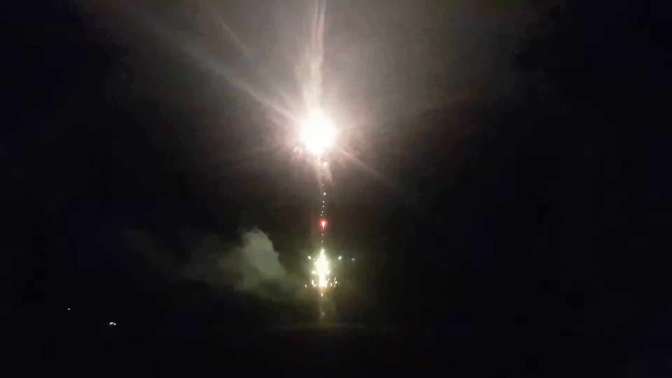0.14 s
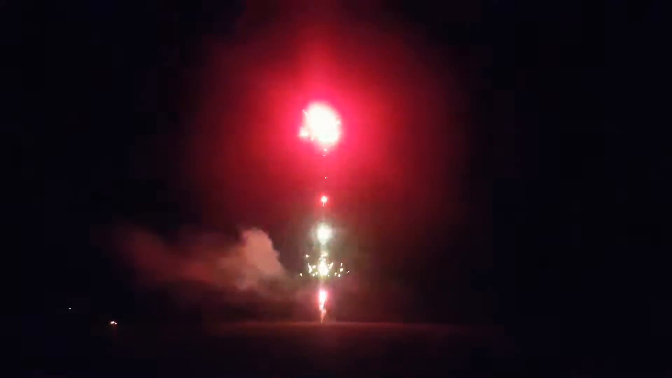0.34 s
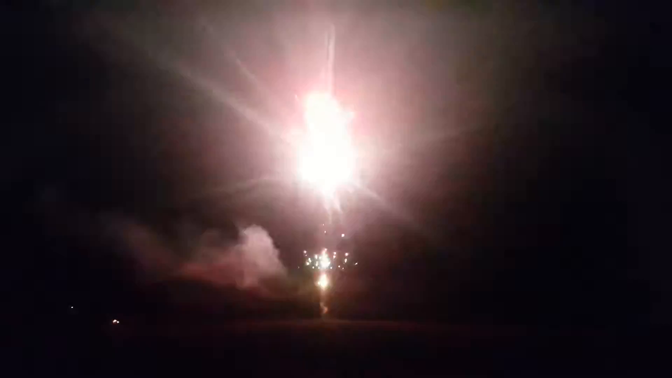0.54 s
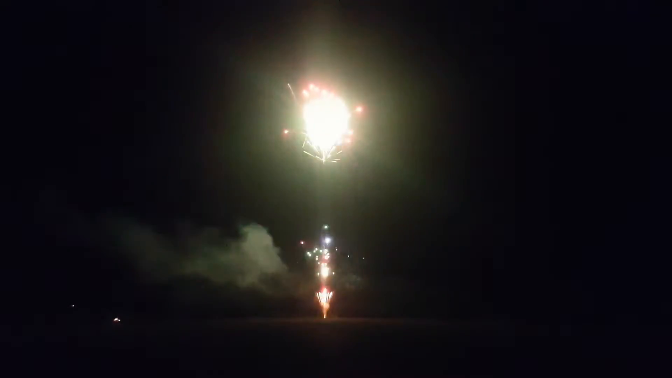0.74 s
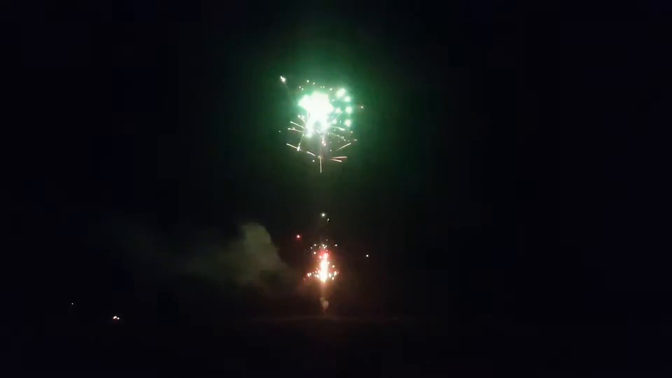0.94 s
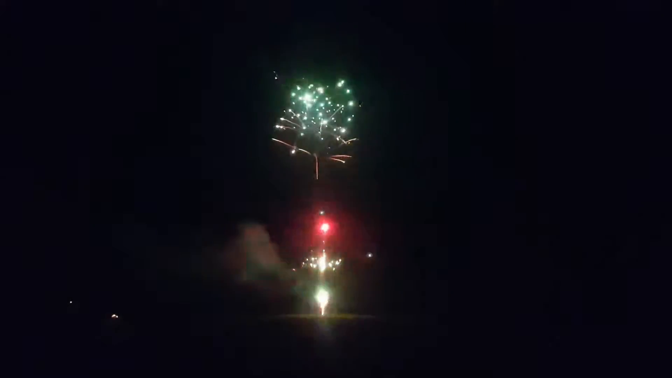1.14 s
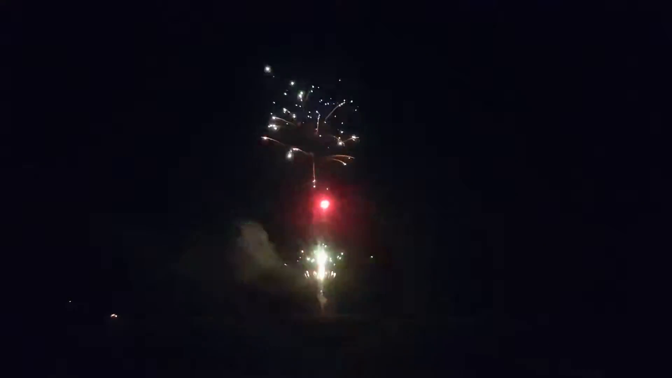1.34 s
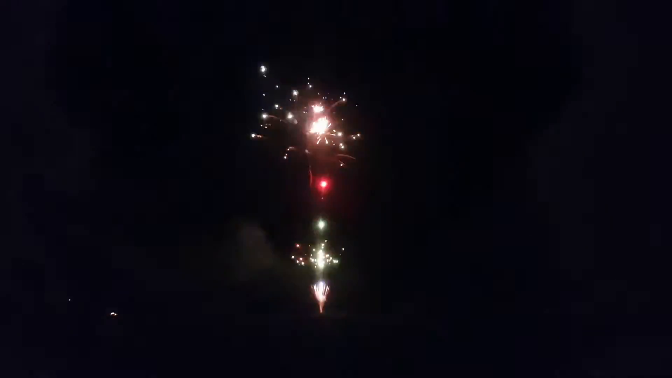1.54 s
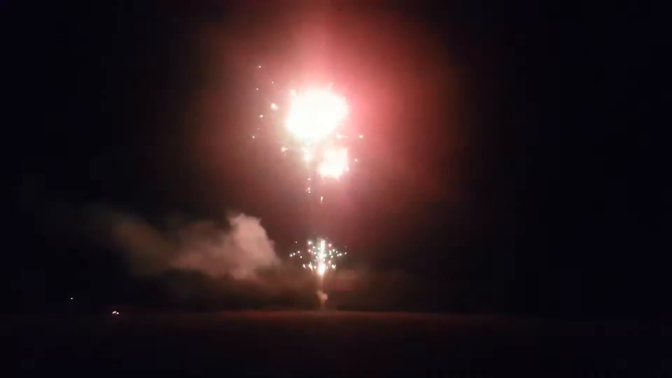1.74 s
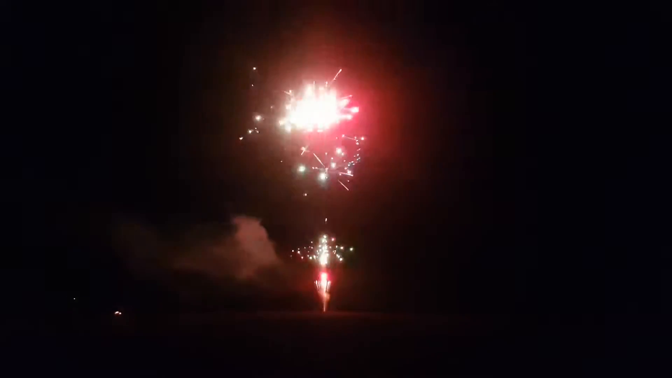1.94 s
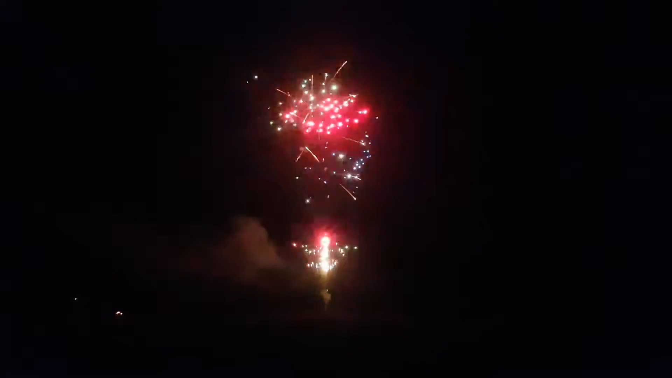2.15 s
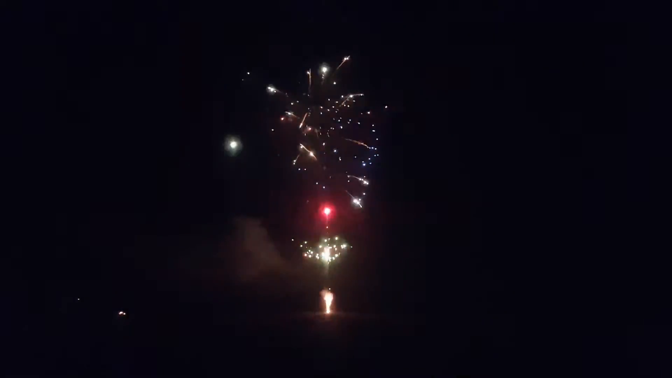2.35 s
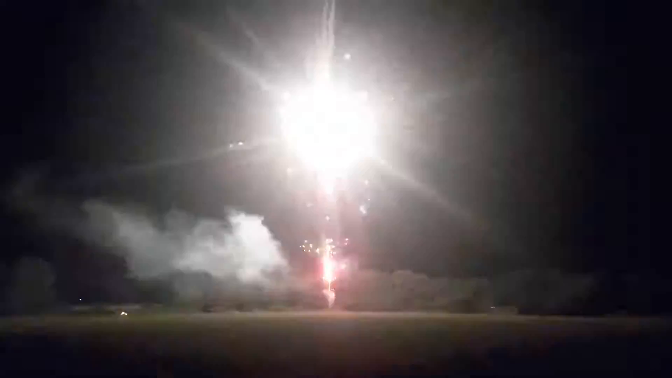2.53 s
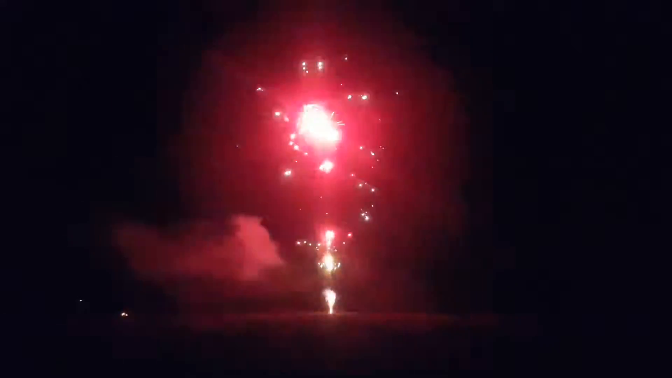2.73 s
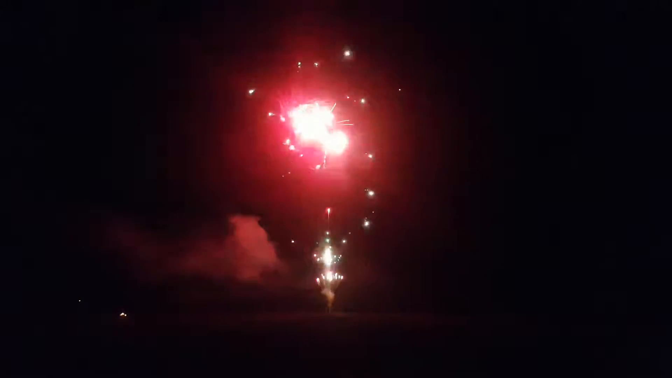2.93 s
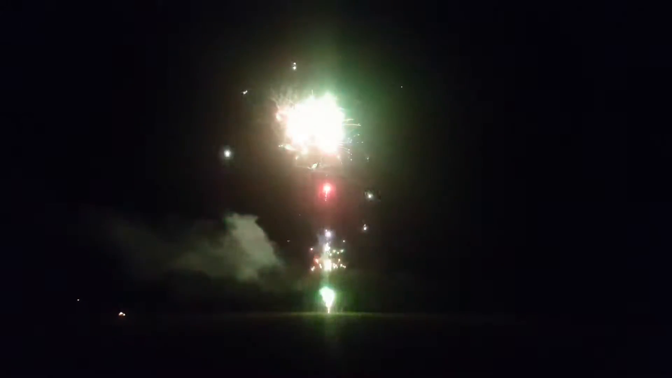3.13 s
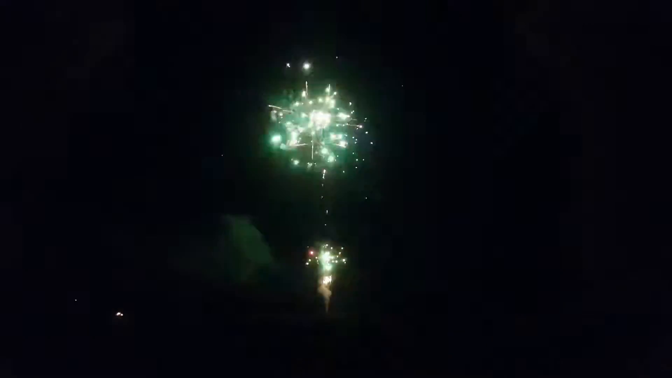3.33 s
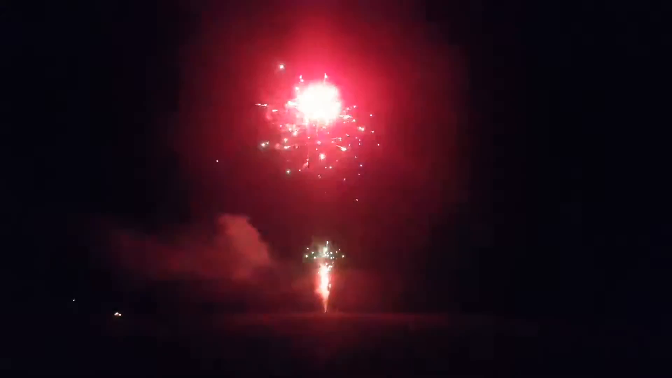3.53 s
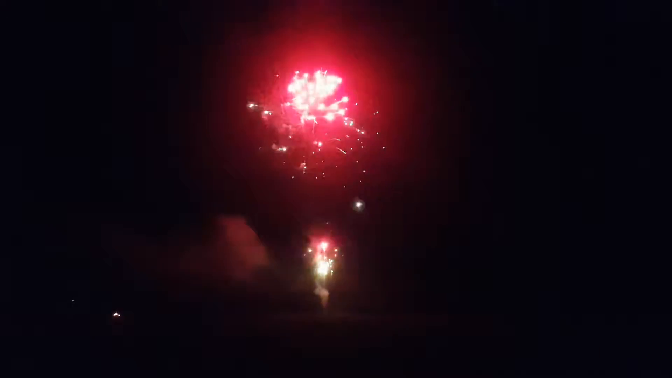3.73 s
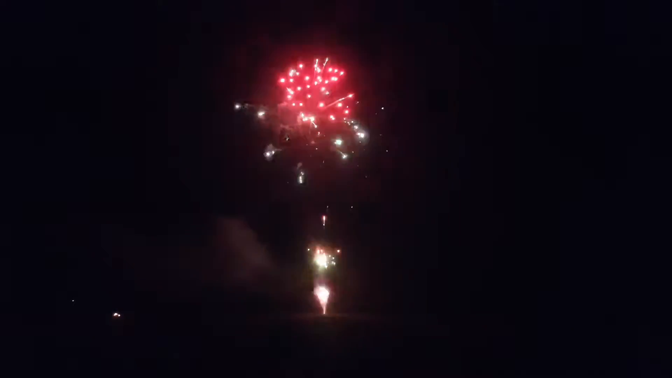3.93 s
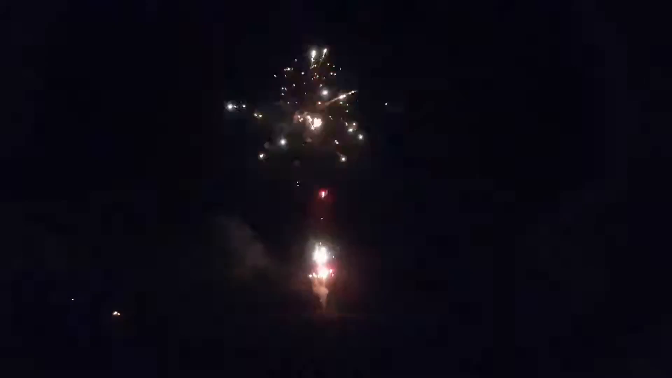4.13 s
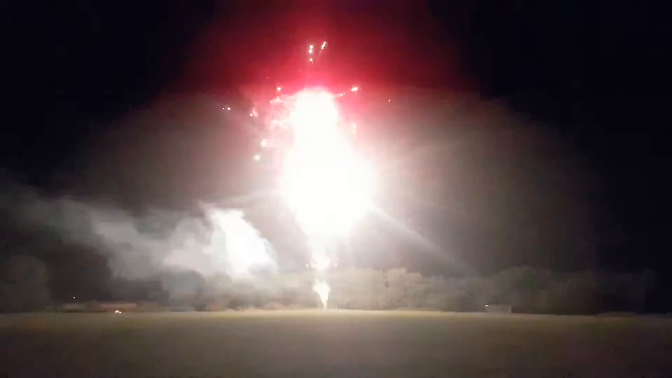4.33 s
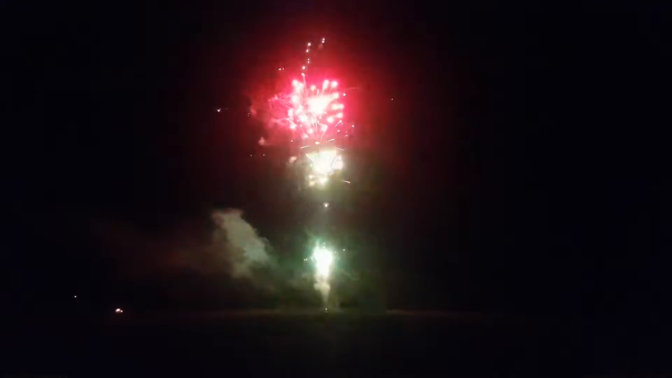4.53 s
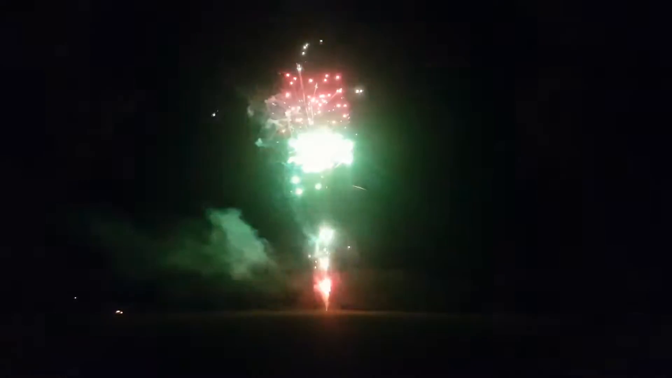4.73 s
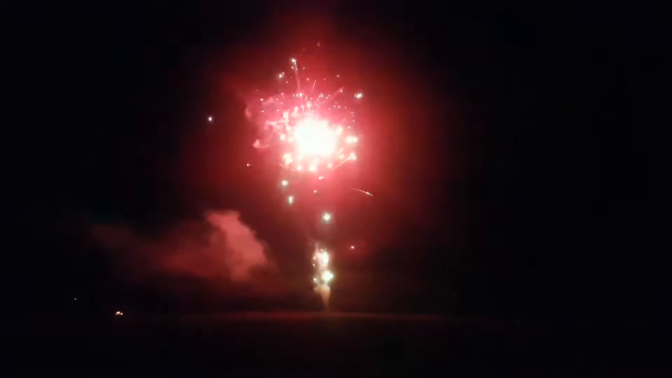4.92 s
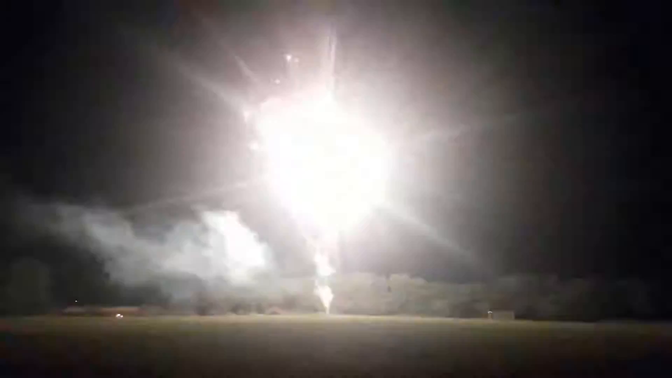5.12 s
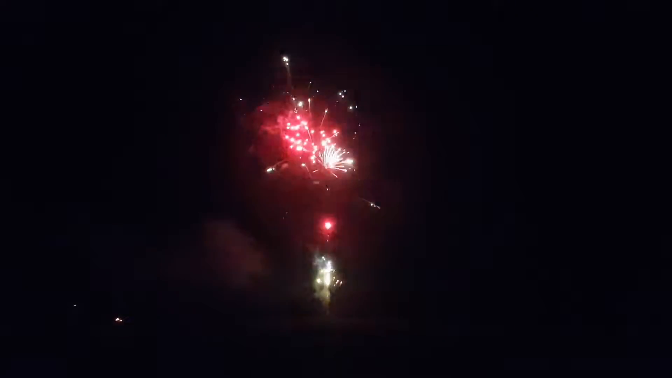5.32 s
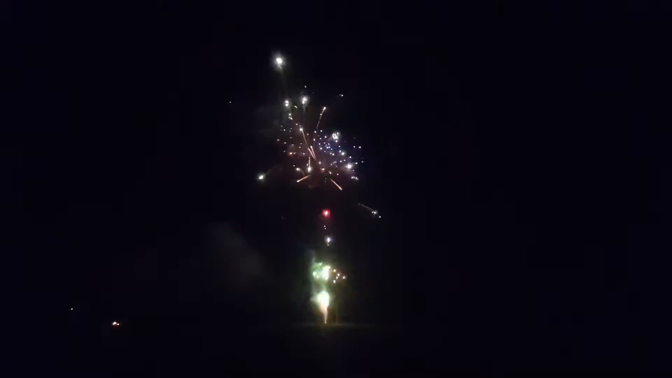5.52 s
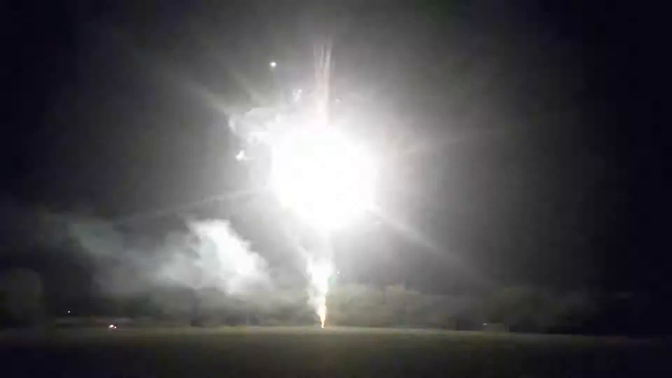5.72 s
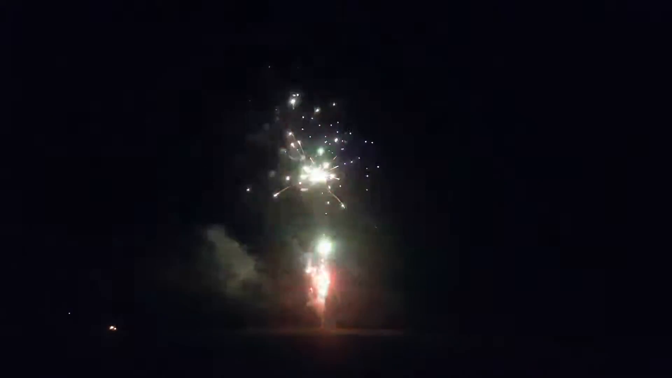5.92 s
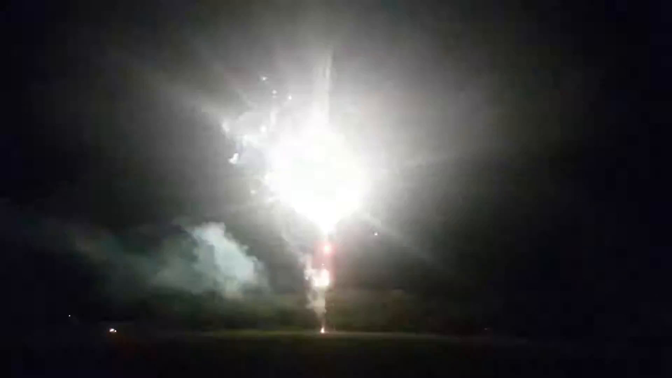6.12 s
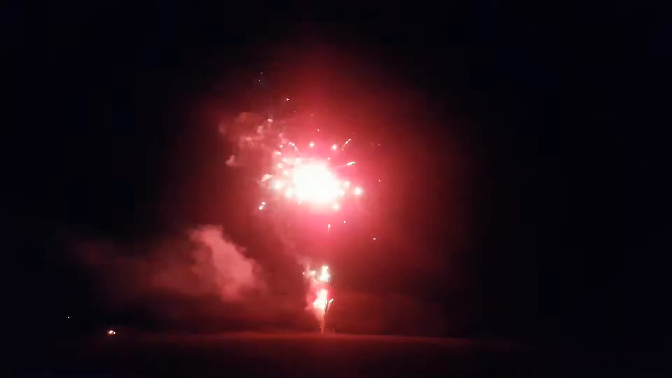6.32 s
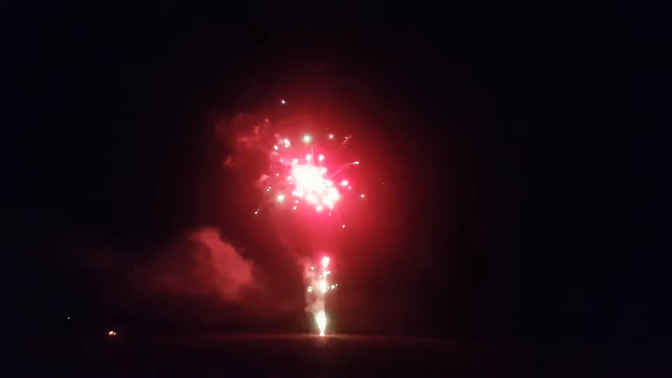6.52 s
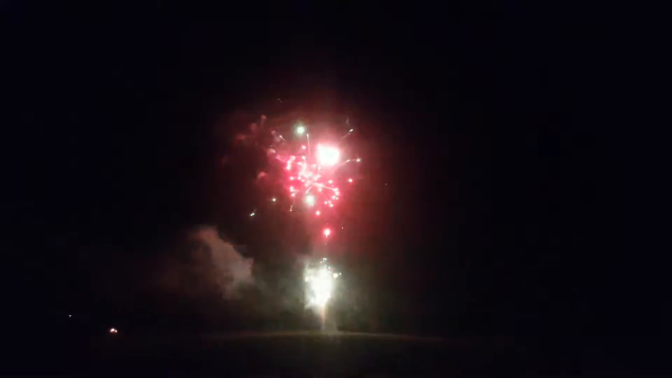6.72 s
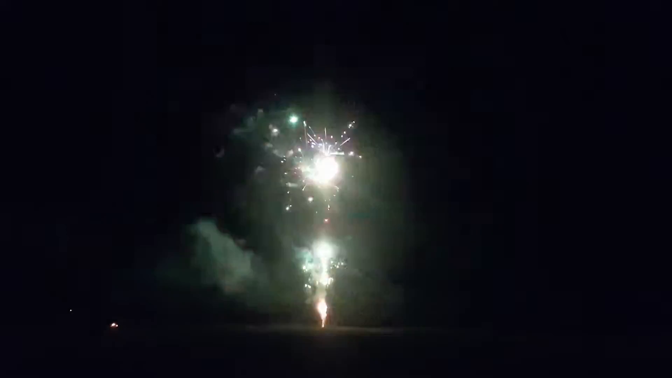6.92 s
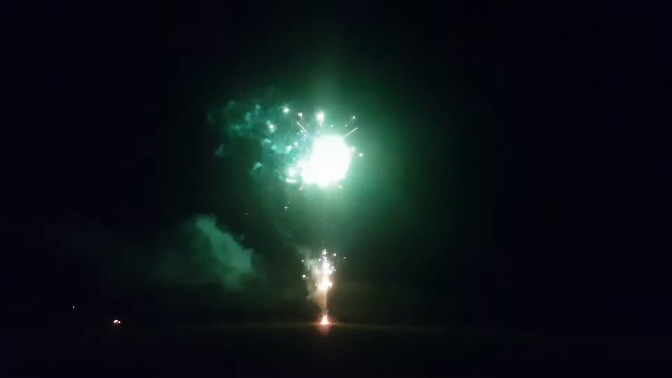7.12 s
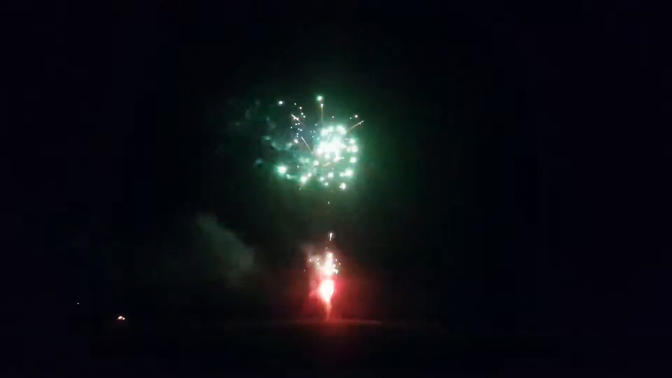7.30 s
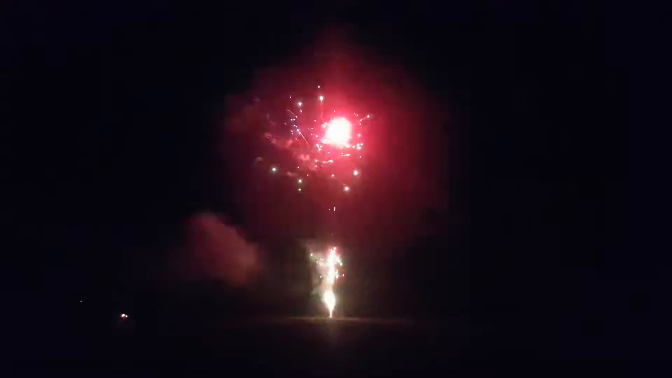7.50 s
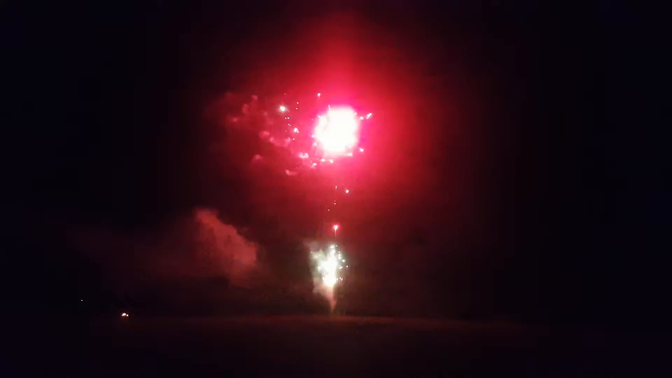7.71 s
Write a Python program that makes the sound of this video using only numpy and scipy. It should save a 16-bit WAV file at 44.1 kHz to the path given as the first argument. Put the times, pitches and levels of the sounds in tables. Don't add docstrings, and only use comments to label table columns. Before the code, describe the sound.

At first only tube pops with woody, knocking tone and short echoes; then a very loud shell crack, followed by irregular single, double and triple bangs until the end. Pops keep launching beneath them. The field is wide, with tree-line reflections smearing each bang for some tenths of a second. Recorded at a distance on a handheld device, distorted on bursts, with thin hiss and slight wind.

```python
import sys
import numpy as np
from scipy import signal
from scipy.io import wavfile
from scipy.ndimage import uniform_filter1d

SR = 44100
rng = np.random.default_rng(int(sys.argv[2]) if len(sys.argv) > 2 else 0)


def inscribe(sig):
    pcm = np.round(np.clip(np.atleast_2d(sig).T, -1, 1) * 32767)
    wavfile.write(sys.argv[1], SR, pcm.astype(np.int16))


def makeup_ratio(level_db):
    decades = np.asarray(level_db, float) / 20
    return 10 ** decades


N = 342216


def evened(x):
    return x / np.sqrt(np.mean(x ** 2) + 1e-20)


def read(points, hz):
    f, value = np.transpose(points)
    return np.interp(np.log(hz + 1), np.log(f + 1), value)


def add(mix, s, sound):
    part = mix[:, round(s * SR):][:, :sound.shape[-1]]
    part += sound[..., :part.shape[1]]


def band(x, lo_hz, hi_hz):
    sos = signal.butter(2, [lo_hz, min(hi_hz, SR / 2.1)], "band", fs=SR, output="sos")
    return signal.sosfilt(sos, x)


def ring(x, hz, q):
    return signal.lfilter(*signal.iirpeak(hz, q, SR), x)


# pitch_hz, likeness (-1 to 1)
PORT_LIKENESS = [(60, 1), (300, 0.89), (640, 0.77), (1400, -0.11), (3100, 0.25), (7000, -0.09)]
# pitch_hz, left_minus_right_db
PORT_BALANCE = [(100, -0.5), (700, 0.3), (2400, -1.5), (8000, -6), (15000, 8.5)]


def port_noise(gain):
    hz = np.fft.rfftfreq(256, 1 / SR)
    a, b, c, d = rng.standard_normal((gain.shape[1], 129, 4)).T
    same = np.clip(read(PORT_LIKENESS, hz), -1, 1)[:, None]
    lean = makeup_ratio(read(PORT_BALANCE, hz) / 2)[:, None]
    left = a + 1j * b
    right = same * left + np.sqrt(1 - same ** 2) * (c + 1j * d)
    spectra = np.array([left * lean, right / lean])
    return signal.istft(spectra * gain, nperseg=256, noverlap=192)[1][:, :N] / 10


# start_s, rumble_db
GUSTS = [(0.0, -68), (0.52, -67.5), (0.84, -65), (1.56, -76), (2.12, -53), (2.64, -81), (2.94, -73.5),
         (3.35, -58), (3.72, -62), (4.9, -60), (5.12, -69.5), (6.33, -83), (6.76, -66), (6.89, -62.5),
         (7.28, -58), (7.76, -61)]


def wind():
    s, rumble_db = np.transpose(GUSTS)
    lumps = evened(uniform_filter1d(rng.standard_normal(N), 2500))
    air = rng.standard_normal((2, N)) + 3.1 * rng.standard_normal(N)
    rumble = evened(band(band(air, 37, 183), 30, 300))
    return rumble * makeup_ratio(np.interp(np.arange(N) / SR, s, rumble_db) + 4.0 + 2.4 * lumps)


def gate():
    open_db, shut_db, closing_db, closing_db_per_s = -79.5, -97.5, -6, 50
    ease_db, ease_growth, ease_s, ease_lag_s = -106, 1.6, .16, .05
    t = np.arange(0, N + 64, 64) / SR
    first_s = BURSTS[0][0]
    closing = np.maximum(open_db + closing_db - closing_db_per_s * (t - first_s), shut_db)
    power = makeup_ratio(np.where(t < first_s, open_db, closing)) ** 2
    for s, db, *_ in BURSTS[1:]:
        swell = np.exp(-((t - s - ease_lag_s) / ease_s) ** 2)
        power = power + makeup_ratio(ease_db + ease_growth * db) ** 2 * swell
    return np.interp(np.arange(N) / SR, t, np.sqrt(power))


# pitch_hz, level_db (per Hz)
HISS_COLOUR = [(100, 6), (1000, -0.5), (9000, -2), (13000, 1), (15650, -2.5), (15900, -33)]


def hiss():
    t = np.arange(N) / SR
    whine_hz, whine_db, drift_hz_per_s = 13590, -14.5, 22
    colour = makeup_ratio(read(HISS_COLOUR, np.fft.rfftfreq(256, 1 / SR)))[:, None]
    steady = evened(port_noise(colour * np.ones(N // 64 + 5)))
    whine = makeup_ratio(whine_db) * np.sin(2 * np.pi * (whine_hz + drift_hz_per_s * t / 2) * t)
    return (steady + whine) * makeup_ratio(10.0) * gate()


# pitch_hz, fade_db_per_s
AIR_FADE = [(200, -11.5), (1000, 4.5), (3000, 0.5), (8000, 20)]


def echoes(times, levels_db, field, colour):
    t, hz = np.arange(N // 64 + 5) * 64 / SR, np.fft.rfftfreq(256, 1 / SR)
    power = np.zeros((len(hz), len(t)))
    for s, db in zip(times, levels_db):
        span = (t > s + field[0][0]) & (t < s + 1.6)
        late = t[span] - s
        shape = 0
        for at, top_db, swell, fade in field:
            below_db = np.maximum(swell * (at - late), fade * (late - at))
            shape = shape + makeup_ratio(top_db - below_db) ** 2
        power[:, span] += shape * makeup_ratio(2 * db - 2 * np.outer(read(AIR_FADE, hz), late))

    def uneven(bins, frames):
        raw = uniform_filter1d(rng.standard_normal((len(t), 129)), bins, 1)
        return evened(uniform_filter1d(raw, frames, 0)).T

    clumps, patches = uneven(40, 3), uneven(3, 16)
    return port_noise(np.sqrt(power) * makeup_ratio(read(colour, hz)[:, None] + 1.5 * clumps + 1.43 * patches))


# delay_s, level_db, swell_db_per_s, fade_db_per_s
TUBE_FIELD = [(.014, -22.5, 9100, 600), (0.053, -22.5, 260, 700), (0.125, -16.5, 2600, 45),
              (0.161, -15, 1300, 160), (0.192, -17, 300, 700), (.4, -31.5, 193, 24)]
# pitch_hz, level_db (per Hz)
TUBE_ECHO_COLOUR = [(71, -49), (120, -23.5), (224, -38), (303, -4.5), (411, -15), (713, 1.5), (853, -14),
                    (1400, 1), (1540, 2), (2360, -3.5), (3130, -14), (4720, -14), (8500, -37.5),
                    (11000, -89), (18700, -120)]


def tube_echoes():
    s, level_db, echo_db = np.transpose(POPS + EDGE_POPS)
    return echoes(s, level_db + echo_db + 14.4, TUBE_FIELD, TUBE_ECHO_COLOUR)


# delay_s, level_db, swell_db_per_s, fade_db_per_s
SHELL_FIELD = [
    (0.015, -10, 9000, 560),
    (.048, -11, 706, 1489.5),
    (0.12, -14.5, 1811, 592),
    (0.195, -14.5, 2200, 74),
    (.245, -10, 200, 121),
    (.06, -22.5, 503, 3.5),
]
# pitch_hz, level_db (per Hz)
SHELL_ECHO_COLOUR = [(71, -35), (120, -16.5), (191, -18), (236, -8), (268, -15), (418, -9), (536, -7),
                     (701, -0.5), (1130, -5), (2570, -9.5), (3020, -18.5), (4640, -17.5), (8500, -33.5),
                     (11000, -91), (18700, -120)]


def shell_echoes():
    s, _, _, echo_db = np.transpose(BURSTS)
    return echoes(s, echo_db, SHELL_FIELD, SHELL_ECHO_COLOUR)


def blast(ms, length_ms, rise_ms):
    u = np.maximum(ms, 0) / length_ms
    rise = 1 - np.exp(-(np.maximum(ms, 0) / rise_ms) ** 2)
    return rise * (1 - u) * np.exp(-u)


def scatter(ms, start_ms, t60_ms, lo_hz, hi_hz):
    common, own = rng.standard_normal(len(ms)), rng.standard_normal((2, len(ms)))
    spray = evened(band(common + 1.3 * own, lo_hz, hi_hz))
    onset = np.clip((ms - start_ms) / 0.21, 0, 1) ** 2
    return spray * onset * makeup_ratio(-60 * (ms - start_ms) / t60_ms)


def slaps(mix, s, sound, table, chance):
    for (late, db), c in zip(table, chance):
        add(mix, s + late, makeup_ratio(db + c) * sound * np.array([[.8], [1.2]]))


# delay_ms, gain
AHEAD_PATHS = [(0, 1), (.52, .5), (1.05, 1.0), (1.3, .2), (1.98, .2)]


def pop(db, chance):
    ms = np.arange(1500) * 1000 / SR
    puffs = sum(g * (1 + .15 * c) * blast(ms - at, 4, .3) for (at, g), c in zip(AHEAD_PATHS, chance))
    wave = 13 * ring(puffs, 2180, 3.2) + .14 * puffs
    snaps = sum(g * blast(ms - .14 - at, .15, .06) for at, g in [(0, 1), (1.13, .85), (2.1, .3)])
    wave = signal.lfilter(*signal.butter(1, 480, "high", fs=SR), wave)
    wave = wave + 2.61 * band(band(snaps, 3630, 5930), 1500, 10000)
    wave = signal.lfilter(*signal.butter(2, 8000, fs=SR), wave)
    wave = wave + 0.033 * blast(ms, 9.0, 0.23) * (ms < 30)
    tube = makeup_ratio(-23) * evened(ring(scatter(ms, 2.4, 30, 1200, 2800), 2150, 9))
    return makeup_ratio(db) * (wave + 0.5 * tube + makeup_ratio(-19.0) * scatter(ms, 1.1, 37.0, 540, 1900))


# start_s, level_db, echo_db
POPS = [(0.007, -30.5, -30), (0.199, -2.5, -21.5), (0.511, -1, -22.5), (0.8208, -9, -46),
        (1.262, -19, -16.5), (1.715, -16, -17.5), (2.0757, -4, -29), (2.4426, -15.2, -25),
        (2.9405, -13.5, -14.5), (3.2126, -24, -22), (3.3046, -9.5, -38), (3.6996, -18.5, -24),
        (4.0162, -20.5, -21), (4.4663, -22.5, -15.5), (4.7707, -11, -26), (5.1992, -23.5, -30),
        (5.6542, -17.5, -23), (6.0249, -20, -26), (6.2957, -18, -19.5), (6.783, -31, 0),
        (7.107, -15.5, -35), (7.469, -16, -15.5)]
# start_s, level_db, echo_db
EDGE_POPS = [
    (-.17, -3.5, -22.5),
    (7.7587, -19.5, -20.0),
]
# delay_s, level_db
TUBE_SLAPS = [(.0575, -23.0), (.19, -28.0)]


def lift_charges(air):
    heard = POPS + EDGE_POPS[1:]
    for (s, db, _), chance in zip(heard, rng.standard_normal((len(heard), 7))):
        sound = pop(db, chance)
        add(air, s - .00021, sound)
        copy = 1.13 * ring(sound, 2560, 5.3) + 0.74 * band(sound, 500, 2600)
        slaps(air, s, copy, TUBE_SLAPS, chance[5:])


# start_s, level_db
FRONTS = [(0.8036, -29), (1.0924, -28), (1.1957, -27), (2.1046, -26), (2.1725, -44), (2.2593, -25),
          (3.1976, -29), (3.4496, -40), (3.4845, -38), (3.9634, -30), (4.7606, -32), (4.8599, -24),
          (4.998, -37), (5.3527, -47), (5.7778, -26), (6.3764, -40), (6.771, -38), (7.2609, -27),
          (7.414, -26)]


def shock_fronts(air):
    click = ring(1. * (np.arange(200) == 2), 14000, 2.5)
    for (s, *_), (_, db) in zip(BURSTS, FRONTS):
        add(air, s, makeup_ratio(db + 23.0) * np.array([0.8 * click, click + 0.33 * np.roll(click, 1)]))


# delay_ms, gain
SKY_PATHS = [(0, 1), (.363, -.88), (.51, .8), (1.45, .34)]


def burst(db, bounce_db, bounce_ms, chance):
    ms = np.arange(1500) * 1000 / SR
    direct = sum(g * (1 + .05 * c) * blast(ms - at, 1.75, .186) for (at, g), c in zip(SKY_PATHS, chance))
    bounce = blast(ms - bounce_ms, 100, .14) * (ms < 20) + .8 * blast(ms - bounce_ms, .25, .12)
    wave = direct + makeup_ratio(bounce_db) * bounce * np.cos(np.pi * ms / 40) ** 2
    wave = wave - .55 * ring(wave, 1680, 2)
    spray = makeup_ratio(-30.5) * scatter(ms, 3.1, 40.7, 270, 1560) + makeup_ratio(-28.0) * scatter(ms, 0.3, 7.4, 1800, 6050)
    crack = makeup_ratio(-43) * scatter(ms, -0.091, 4, 9000, 16000)
    return makeup_ratio(db) * (wave + spray + crack)


# start_s, level_db, bounce_ms (ground bounce delay), echo_db
BURSTS = [(0.8046, 16, 3.45, -13.5), (1.0934, 8, 3.28, -15.5), (1.197, 8, 2.97, -17),
          (2.1056, 15, 3.34, -13.5), (2.1736, 9.5, 3.65, -17), (2.2601, 9.5, 2.74, -15),
          (3.1989, 14, 3.34, -11.5), (3.4508, 8, 3.35, -22), (3.4858, 8.2, 3.04, -13),
          (3.9643, 8.5, 3.2, -17), (4.7616, 11, 3.25, -16), (4.861, 9, 2.96, -15.5),
          (4.999, 7.5, 2.66, -16), (5.3535, 6.5, 3.03, -15), (5.779, 9.5, 2.73, -15),
          (6.3774, 9.5, 2.78, -13), (6.772, 9, 2.67, -12.5), (7.2617, 7.5, 3.2, -16), (7.415, 9, 2.8, -17)]
# delay_s, level_db
SHELL_SLAPS = [(.0468, -20.0), (.122, -31.0)]


def shells(air):
    quiet_bounce_db, bounce_growth = -6.5, 0.55
    for (s, db, bounce_ms, _), chance in zip(BURSTS, rng.standard_normal((len(BURSTS), 7))):
        sound = burst(db, quiet_bounce_db - (1 - bounce_growth) * db, bounce_ms, chance)
        add(air, s, sound)
        slaps(air, s, 1.55 * ring(ring(sound, 3500, 4.1), 2440, 3.0), SHELL_SLAPS, chance[4:])
        add(air, s + .0115, makeup_ratio(-27.5) * band(sound, 194, 1100))


def scene():
    air = np.zeros((2, N))
    shells(air)
    lift_charges(air)
    shock_fronts(air)
    air += np.array([[-.2], [.3]]) * band(air, 1800, 12000)
    return air + shell_echoes() + tube_echoes()


# start_s, share (0-1)
LOW_CUT_DEPTH = [(0.8, .78), (3.2, .78), (3.45, .4), (3.96, .02), (4.76, .28), (5.0, .28), (5.35, .72),
                 (5.78, .44), (6.38, .7), (7.26, .27)]


def low_cut(x):
    share = np.clip(np.interp(np.arange(N) / SR, *np.transpose(LOW_CUT_DEPTH)), 0, 1)
    return x - share * signal.oaconvolve(x, signal.firwin(801, 307, fs=SR)[None], "same")


def microphone(x):
    port = 2 * np.pi * 282
    x = signal.lfilter(*signal.bilinear([1, 0, 0], [1, port / 1.97, port ** 2], SR), x)
    top = band(band(x, 9580, 16000), 11000, 16500)
    return signal.sosfilt(signal.cheby2(8, 40, 9800, fs=SR, output="sos"), x) + top


def roll_off(x):
    return signal.sosfilt(signal.butter(12, 16840, fs=SR, output="sos"), x)


def record(dry):
    x = low_cut(microphone(dry))
    x = x + wind() + hiss()
    x = x / (1 + abs(x / .98) ** 12) ** (1 / 12)
    x = signal.oaconvolve(x, signal.firwin(255, 16700, fs=SR)[None], "same")
    return roll_off(x)


dry = scene()
out = record(dry)
inscribe(out)
```